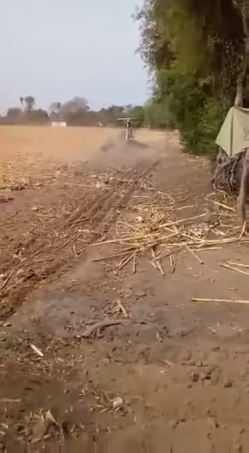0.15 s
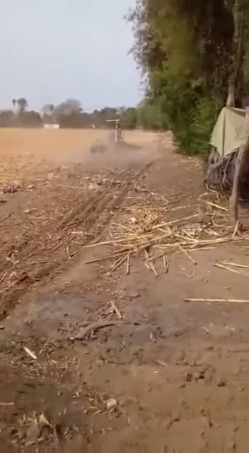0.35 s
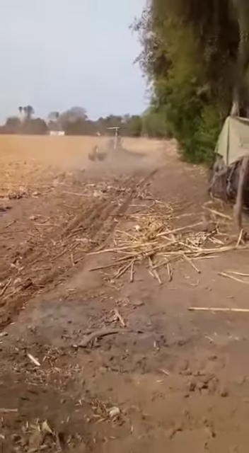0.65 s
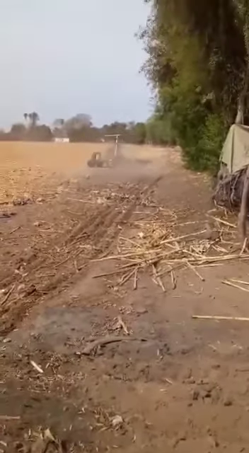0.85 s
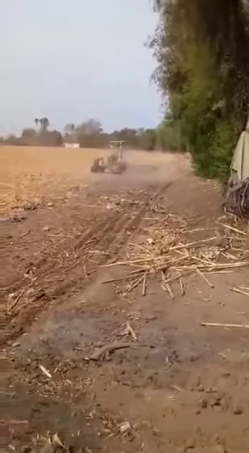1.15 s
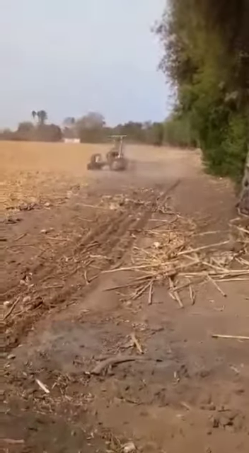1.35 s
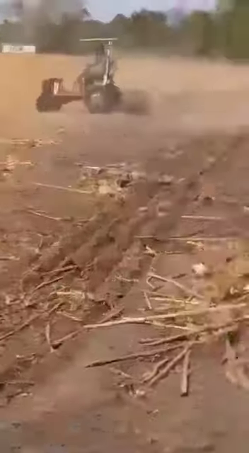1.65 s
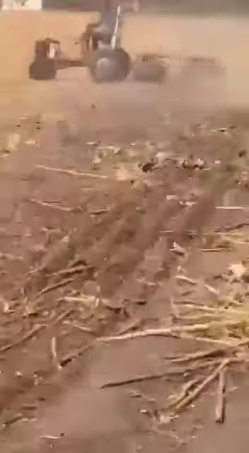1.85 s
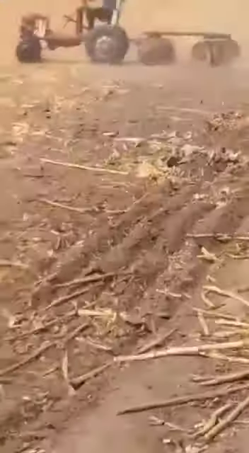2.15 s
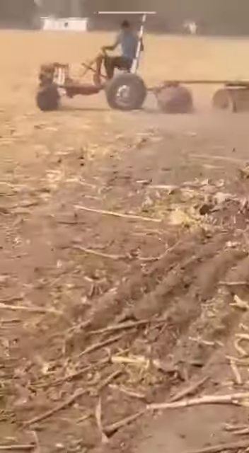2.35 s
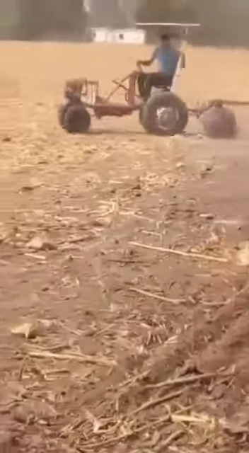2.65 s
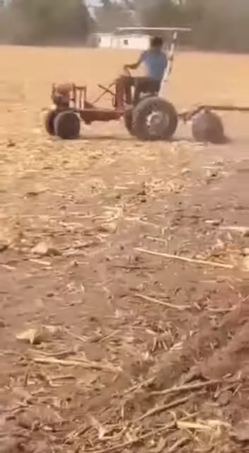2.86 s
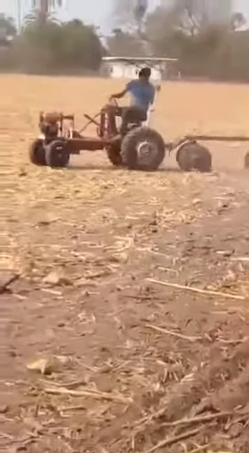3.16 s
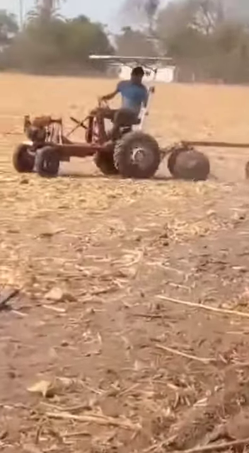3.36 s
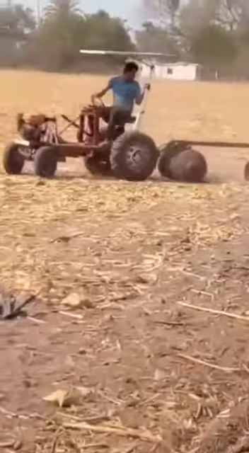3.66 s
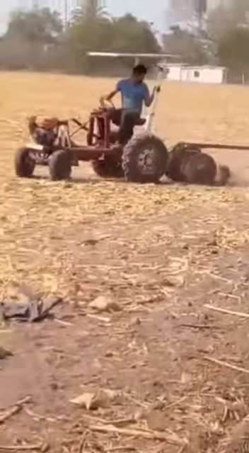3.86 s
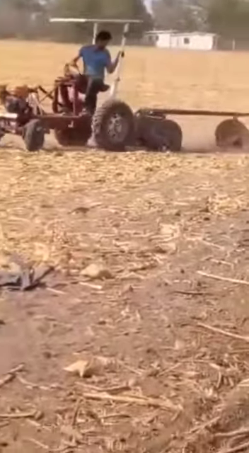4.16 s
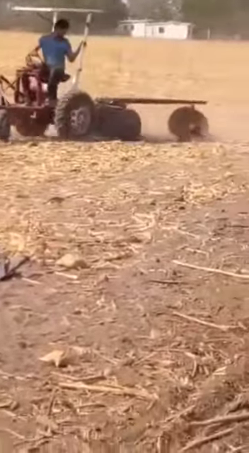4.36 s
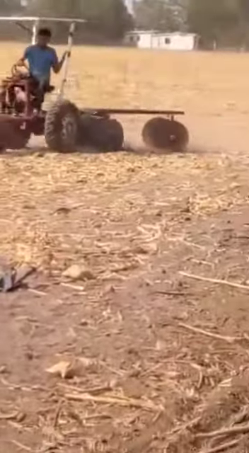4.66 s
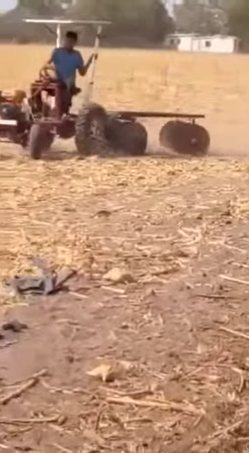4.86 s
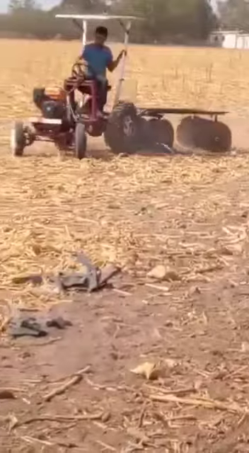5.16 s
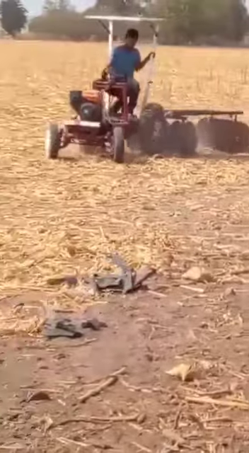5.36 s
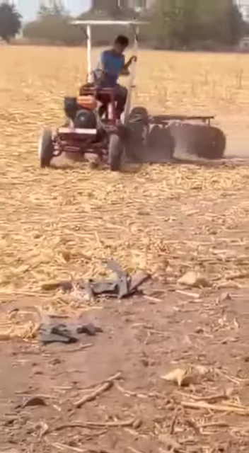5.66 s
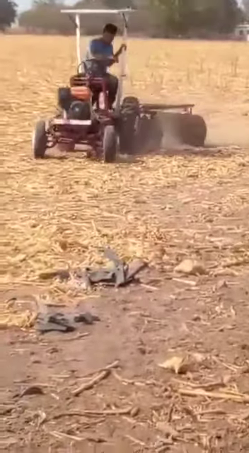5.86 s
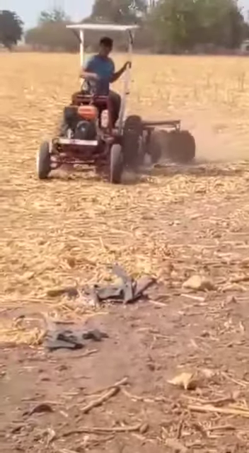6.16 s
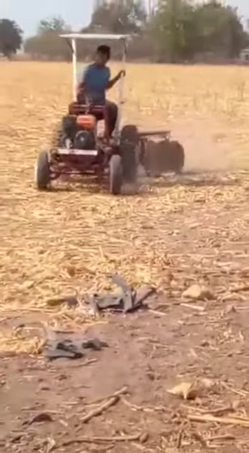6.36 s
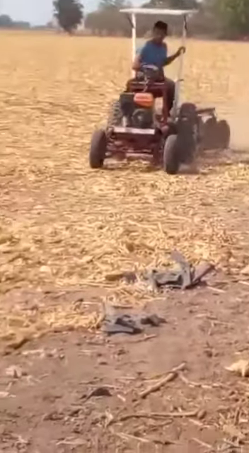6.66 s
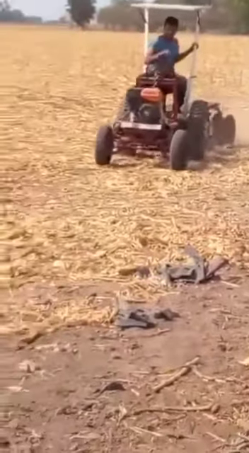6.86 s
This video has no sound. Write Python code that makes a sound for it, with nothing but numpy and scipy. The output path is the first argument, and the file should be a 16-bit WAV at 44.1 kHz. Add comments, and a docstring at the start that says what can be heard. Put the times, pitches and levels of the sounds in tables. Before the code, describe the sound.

A small one-cylinder petrol engine runs throughout in a dry open field, about 26 muffled thuds a second, nearly steady with a slight sag at the start. Valve clatter and papery disc hiss pulse with it. Wind rumbles and bumps the microphone in the first 2.5 seconds, with faint clanks at 0, 0.6, 1.3 and 2.1. Between 1.7 and 2.5 the rattle changes from distant to near, and the exhaust gradually grows. Thin chirps come at 0.5, 1.2, 1.75 and 2.8, more around 4.2 to 5.3. A sharper clank and stone tick fall at 3.8; two faint dove coos follow at 4.5 and 4.8. From 4.3 to 5 the tractor turns head-on, the engine fullest around 5.5 to 6.2. Gusts thump strongly at 5.2 to 6.8, with ticks and a clank near 6.6, the engine easing slightly but still running at 7.

```python
"""Tractor and disc harrow on dry stubble

A home-made tractor with a one-cylinder petrol engine drags a disc harrow and turns toward the microphone.
Pulses through a resonant muffler make the exhaust and intake thuds; noise beating with the engine's cycle
makes the clatter and the harrow's hiss, and decaying modes and noise its clanks and ticks on stones.
Birds chirp and a dove coos in gliding tones; gusts are low noise and short pressure swings."""
import sys
import numpy as np
from scipy import signal
from scipy.fft import rfft, irfft, next_fast_len
from scipy.io import wavfile
from scipy.ndimage import uniform_filter1d, map_coordinates

SR = 44100
rng = np.random.default_rng(int(sys.argv[2]) if len(sys.argv) > 2 else 0)


def transcribe(u):
    """Save the signal u as a 16-bit wav file named by the first command-line argument.

    u: samples, shape (n,) or (channels, n), limited to [-1, 1]; the rate is SR.
    q: integer samples, one column per channel.
    """
    v = np.clip(np.atleast_2d(u).T, -1, 1)
    q = np.round(v * 32767).astype(np.int16)
    wavfile.write(sys.argv[1], SR, q)


N = 309141  # length in samples

# Gusts. Each row: time of the peak in seconds, full width at 1/e in seconds, wind strength in dB.
GUSTS = [(.14, 0.21, -30.5), (0.414, 0.093, -30.5), (0.916, 0.94, -28.5), (1.33, 0.25, -26.5),
         (1.855, 0.14, -30), (2.137, 0.34, -27.5), (2.515, 0.064, -27), (3.947, 0.45, -33),
         (4.197, 0.11, -30), (5.236, 0.28, -25), (5.46, 0.2, -29.5), (5.822, 0.12, -24), (6.177, 0.27, -20),
         (6.38, 0.21, -25.5), (6.73, 0.27, -26.5)]
# The hardest eddies. Each row: time in seconds, relative push in dB, nominal push frequency in Hz,
# flick in dB.
BUFFETS = [(.104, -2.5, 91, -16), (0.424, -13, 121, -35), (.856, -6, 101, -22), (.926, -5, 113, -13),
           (.961, -13, 129, -19), (1.018, -10.5, 150, -15), (1.112, -5, 105, -44), (1.319, -3.5, 131, -9),
           (1.98, -8, 146, -27), (2.003, -9, 160, -28), (2.071, -19, 220, -14.5), (2.083, -9, 172, -12),
           (2.146, -12, 130, -13.5), (2.236, -8.5, 197, -7.5), (2.341, -14, 140, -23),
           (3.884, -15.5, 203, -18.5), (4.203, -16, 108, -30), (5.158, -14, 140, -11.5),
           (6.12, -5.5, 110, -12.5), (6.159, -7, 129, -9), (6.206, -5, 110, -10), (6.221, -4.5, 100, -12.5),
           (6.257, -5.5, 118, -13), (6.295, -9.5, 168, -9.5), (6.683, -10, 120, -10),
           (6.796, -10, 140, -12.5)]
# Spectrum of wind rumble on the microphone. Each row: frequency in Hz, relative density in dB per Hz.
RUMBLE_SPECTRUM = [(15, -40), (30, -25), (48, -8.5), (75, -1), (125, -2), (180, -11.5), (280, -11),
                   (420, -27), (700, -43), (1500, -52)]
# Spectrum of the brighter tearing of a strong gust. Each row: frequency in Hz, relative density in dB per Hz.
TEARING_SPECTRUM = [(160, -8.5), (290, 3), (450, -10.5), (620, -14.5), (850, -24)]
BREEZE_DB = -34.5  # mean wind strength between gusts
LULL_S, LULL_LENGTH_S, LULL_DB = 4.39, 0.18, -25  # the air falls still once
TEARING_DB, TEARING_EXPONENT = 6.5, 1.734  # level at full-scale wind; growth faster than the rumble's
SMALL_EDDIES_PER_S, SMALL_EDDY_HZ = 4.4, 125  # mean rate; nominal push frequency
SMALL_PUSH_DB, SMALL_FLICK_DB = 4, -4  # relative push over the wind; flick over that push

# Notes of a three-note bird call. Each row: delay in seconds, length in seconds, start, middle and end
# frequency in Hz, relative level in dB; each call rescales time and pitch.
PHRASE_NOTES = [(0, 0.05, 5230, 4790, 4070, -4.5), (.055, .04, 4220, 4440, 4700, -1),
                (.143, .028, 3400, 4100, 3800, 0.5)]
# Notes of a slurred call. Each row: the same columns in the same units.
SLUR_NOTES = [(0, 0.036, 4520, 4316, 3690, -0.5), (.046, 0.0302, 3380, 3377, 3140, -0.42)]
# A single falling note. Each row: the same columns in the same units.
DROP_NOTES = [(0, .042, 5300, 4750, 3550, 0)]
# A single arched note. Each row: the same columns in the same units.
ARCH_NOTES = [(0, .05, 4300, 5550, 3900, 0)]
# When the three-note call is sung. Each row: time in seconds, pitch ratio, length ratio, relative level in dB.
PHRASE_CALLS = [(.475, 1, 0.99, -33), (4.188, 1.01, 0.99, -34)]
# When the slur is sung. Each row: time in seconds, pitch ratio, length ratio, relative level in dB.
SLUR_CALLS = [(1.753, 1, 1, -31.5), (2.763, 1.03, .7, -37), (4.785, 1, 1, -34.5),
              (5.285, 1.16, 0.98, -33.5)]
# When the falling note is sung. Each row: time in seconds, pitch ratio, length ratio, relative level in dB.
DROP_CALLS = [(.277, .92, .9, -39), (2.223, 1, 1, -40), (5.91, 1, 0.99, -37)]
# When the arched note is sung. Each row: time in seconds, pitch ratio, length ratio, relative level in dB.
ARCH_CALLS = [(1.152, 0.95, .8, -40), (1.174, 0.91, .62, -36), (1.23, 0.95, 1.1, -42),
              (1.992, 1, 0.84, -46), (2.008, 0.86, 1, -44), (2.07, 1.02, 0.85, -39),
              (3.22, 0.98, 0.58, -37.5), (3.545, 1.09, 1.3, -40), (4.256, 1.03, 0.95, -40)]
# Coos of a distant dove. Each row: time in seconds, level in dB.
COOS = [(4.49, -38), (4.82, -44)]
COO_S, COO_HZ, COO_RISE_HZ = 0.127, 493, 55

# Stones ticking on the discs. Each row: time in seconds, relative level in dB, ring frequency in Hz.
TICKS = [(3.784, -23, 5700), (5.7264, -24.5, 5880), (6.5565, -22.5, 5920), (6.6288, -29.5, 5850),
         (6.89, -28, 5800)]
# Clanks of the harrow frame. Each row: time in seconds, relative level in dB.
CLANKS = [(0.029, -27), (0.589, -29), (1.272, -29), (1.496, -34), (2.1482, -25.5), (3.61, -27),
          (3.7864, -21), (6.616, -27)]
# Modes of the harrow frame. Each row: frequency in Hz, mean relative level in dB, 60 dB decay in seconds.
FRAME_MODES = [(1000, -2, 0.048), (1421, 7, 0.12), (1850, 5.5, 0.1), (2560, 13.5, 0.051), (2970, 5, 0.076)]
# Spectrum of a stone's crack. Each row: frequency in Hz, relative density in dB per Hz.
CRACK_SPECTRUM = [(1500, -24), (3500, -7), (4800, 10.5), (6200, 7), (7200, -9), (8100, 9), (11000, -46)]

# Rattle spectrum far off. Each row: frequency in Hz, relative density in dB per Hz.
FAR_RATTLE = [(480, -39), (850, 0), (1180, -34), (2000, -13), (2100, -0.5), (2270, 5.5), (3040, 0),
              (3440, 2.5), (3800, -4.5), (4210, -8.5), (4560, -15), (4880, -3), (6500, -12.5), (8450, -41),
              (14300, -120)]
# Rattle spectrum near, side-on. Each row: frequency in Hz, relative density in dB per Hz.
SIDE_ON_RATTLE = [(1180, -69), (2000, -15), (2120, -3.5), (2410, 4.5), (2730, 3), (2980, -3.5),
                  (3340, -4.5), (3670, -10.5), (4030, -5), (4510, -12), (4860, -7), (5360, -6),
                  (6500, -27.5), (8450, -50), (14300, -120)]
# Rattle spectrum near, head-on. Each row: frequency in Hz, relative density in dB per Hz.
HEAD_ON_RATTLE = [(1180, -40), (2000, -7), (2050, -10), (2420, 5), (2530, 2.5), (2780, 1.5), (3000, -9),
                  (4190, -10.5), (4490, -14), (4760, -13.5), (4960, -5.5), (6010, -16), (6500, -42),
                  (8450, -56), (14300, -120)]
# Spectrum of the engine block's panels. Each row: frequency in Hz, relative density in dB per Hz.
BLOCK_SPECTRUM = [(150, 7.5), (450, 7.5), (520, -11), (600, -2.5), (730, 0), (950, 0), (1080, 2),
                  (1280, -7.5), (1470, 3), (1610, -3), (1800, 3), (1930, -1), (2050, -14), (2400, -48)]
# Spectrum of discs in dry soil and straw, far off. Each row: frequency in Hz, relative density in dB per Hz.
FAR_STRAW = [(5500, -17), (7000, 1.5), (8300, -2.5), (9000, -2.5), (10300, -1), (13000, 0), (14600, 4),
             (15700, -4)]
# Spectrum of discs in dry soil and straw, near. Each row: frequency in Hz, relative density in dB per Hz.
NEAR_STRAW = [(5800, -3), (6600, -3.5), (7300, -2.5), (7650, 3), (8150, 0), (8500, 0.5), (9250, -2),
              (9850, 1), (11000, -0.5), (12000, 2.5), (12800, -1.5), (14200, 0), (15000, -3.5),
              (15700, -10)]
# Engine block as the tractor nears and turns. Each row: time in seconds, relative level in dB.
BLOCK_LEVEL = [(0.0, -40.5), (0.17, -43.5), (0.78, -41), (1.29, -43.5), (2.58, -43), (2.69, -41.5),
               (3.9, -40.5), (4.08, -43.5), (4.33, -43), (4.74, -38.5), (5.27, -36.5), (5.74, -36),
               (6.33, -41.5), (7.01, -40)]
# Valve clatter. Each row: time in seconds, relative level in dB.
VALVE_LEVEL = [(0.0, -39.5), (0.43, -37), (0.9, -40), (1.09, -39.5), (1.4, -43), (1.66, -42), (2.3, -40),
               (3.4, -38.5), (4.06, -36), (4.57, -36), (5.06, -35.5), (5.33, -34.5), (5.95, -36.5),
               (6.27, -40), (7.01, -41)]
# Hiss of the harrow. Each row: time in seconds, relative level in dB.
HISS_LEVEL = [(0.0, -46.5), (0.35, -43.5), (1.35, -47.5), (1.93, -46.5), (2.24, -46), (2.89, -43),
              (3.32, -45), (4.08, -40), (4.49, -43.5), (5.23, -40), (5.68, -43.5), (6.01, -43.5),
              (6.27, -47.5), (7.01, -46.5)]
# Discs cutting thicker straw. Each row: time in seconds, full width at 1/e in seconds, rise of the hiss in dB.
SWISHES = [(0.147, 0.093, 1.5), (1, 0.12, 5.5), (1.822, 0.12, 6), (3.125, .1, 2.5), (3.807, 0.088, 3)]
# Approach of the tractor. Each row: time in seconds, near share of the power.
NEARNESS = [(1.7, 0.23), (2.5, 0.99)]
# Turn toward the microphone. Each row: time in seconds, head-on share of the near power.
FACING = [(4.3, 0.06), (5, 1)]
# Knocks at the firing, then as the valves shut. Each row: place in the cycle as a fraction, relative size.
KNOCKS = [(0, 0.92), (.32, 0.17), (.7, 0.18)]
# A nearby reflection. Each row: time in seconds, delay in seconds, strength as an amplitude ratio.
REFLECTION = [(0, 0.0015, 0.071), (.7, 0.0017, 0), (1.4, 0.00094, 0.031), (2.6, 0.00097, 0.09),
              (7, 0.0021, 0.091)]

# Engine speed sagging under the load. Each row: time in seconds, mean firings per second.
ENGINE_SPEED = [(0, 27.03), (.35, 25.77), (.7, 26.04), (1.575, 25.83), (2.45, 26.22), (3.15, 26.2),
                (3.85, 26.68), (4.55, 26.57), (5.25, 26.3), (5.95, 26.55), (6.45, 26.83), (7, 26.45)]
# Exhaust loudness. Each row: time in seconds, relative level in dB.
EXHAUST_LEVEL = [(0, -37), (1.6, -32.5), (2.8, -31.5), (3.5, -32.5), (4.2, -29), (5.5, -27.5), (6.2, -27),
                 (7, -31)]
# Response of the muffler and air box. Each row: frequency in Hz, relative gain in dB.
MUFFLER_RESPONSE = [(25, -38), (55, 2.5), (105, -5), (132, 3.5), (160, 0), (185, -8.5), (238, 4), (268, -7),
                    (318, 2), (355, -7), (397, 1.34), (425, -9), (452, -12.5), (580, -30), (1100, -27),
                    (2200, -64)]
BOOM_DB = -37  # mean level: the pipe's low note carries evenly at any distance
TOP_HZ = 15750  # band limit


def amp(db):
    """Logarithmic level: decibels become an amplitude ratio."""
    return 10 ** (np.asarray(db) / 20)


def unit(x):
    """Normalisation: scale to an rms of 1."""
    return x / np.sqrt(np.mean(x ** 2) + 1e-20)


def gain(points, hz):
    """Frequency response: interpolate dB over log frequency, falling away past the ends."""
    f, db = np.transpose(points)
    corners = np.r_[f[0] / 2, f, f[-1] * 2]
    return amp(np.interp(np.log(hz + 1), np.log(corners), np.r_[-120, db, -120]))


def curves(rows):
    """Linear interpolation: one value per sample for each column after the time."""
    s, *columns = np.transpose(rows)
    return [np.interp(np.arange(N) / SR, s, column) for column in columns]


def wobble(rate):
    """Slow random modulation: a smooth curve through rate random knots a second."""
    knots = rng.standard_normal(int(N * rate / SR) + 4)
    return map_coordinates(knots, [np.arange(N) * rate / SR])


def swell(s, length):
    """Gaussian envelope: a bell-shaped rise and fall around time s."""
    return np.exp(-(2 * (np.arange(N) / SR - s) / length) ** 2)


def filtered(x, response):
    """Linear filtering: multiply the spectrum of x by a response of frequency."""
    m = next_fast_len(N + SR // 2)
    return irfft(rfft(x, m) * response(np.fft.rfftfreq(m, 1 / SR)), m)[:N]


def noise(points):
    """Coloured noise: white noise shaped by a spectrum, at rms 1."""
    return unit(filtered(rng.standard_normal(N), lambda hz: gain(points, hz)))


def impulse(points, size=16384):
    """Minimum phase: the causal ring of a body with this spectrum, at peak 1."""
    log_spectrum = np.log(gain(points, np.fft.rfftfreq(size, 1 / SR)) + 1e-3)
    cepstrum = irfft(log_spectrum)
    # folding the cepstrum onto positive times makes the ring causal
    cepstrum[1:size // 2] *= 2
    cepstrum[size // 2 + 1:] = 0
    ring = irfft(np.exp(rfft(cepstrum)))
    return ring / np.abs(ring).max()


def add(track, s, sound):
    """Superposition: mix a sound into the track at time s."""
    part = track[max(round(s * SR), 0):][:len(sound)]
    part += sound[:len(part)]


def scattered(x, t60):
    """Diffuse reflection: decaying noise answers for foliage and ground, as strong as the sound itself."""
    t = np.arange(SR // 3) / SR
    tail = rng.standard_normal(len(t)) * amp(-60 * t / t60)
    return unit(signal.fftconvolve(x, tail)[:N]) * np.std(x)


def eddy(t, hz, width):
    """Turbulent pressure: a windowed swing of about one cycle, with random phase and varied frequency."""
    hz = hz * np.exp(0.12 * rng.normal())
    phase = rng.uniform(0, 2 * np.pi)
    return np.exp(-(t / width) ** 2) * np.cos(2 * np.pi * hz * t + phase)


def buffets(strength):
    """Eddy impact: each eddy lands on the microphone as a quick flick and a slower push."""
    small = []
    for place, size in rng.random((round(SMALL_EDDIES_PER_S * N / SR), 2)):
        push_db = 20 * np.log10(strength[int(place * N)] * size) + SMALL_PUSH_DB
        small.append((place * N / SR, push_db, SMALL_EDDY_HZ, push_db + SMALL_FLICK_DB))
    thumps, t = np.zeros(N), np.arange(-SR // 30, SR // 30) / SR
    for s, push_db, push_hz, flick_db in BUFFETS + small:
        push = amp(push_db - 2.0) * eddy(t - .004, hz=push_hz, width=0.0057)
        haste = amp(np.clip(0.34 * (flick_db + 9.5), -2, 1))  # stronger eddies pass faster
        flick = amp(flick_db) * eddy(t * haste, hz=336, width=0.0013)
        add(thumps, s + t[0], push + flick)
    return thumps


def wind():
    """Flow noise: gusts on a light breeze rumble on the microphone port and tear more brightly when strong."""
    breeze = amp(BREEZE_DB + LULL_DB * swell(LULL_S, LULL_LENGTH_S) + 1.5 * wobble(9))
    gust_power = sum((amp(db) * swell(s, length)) ** 2 for s, length, db in GUSTS)
    strength = np.sqrt(breeze ** 2 + gust_power)
    rumble = amp(4.0) * strength * unit(noise(RUMBLE_SPECTRUM) * amp(2.07 * wobble(35)))
    flutter = unit(noise(TEARING_SPECTRUM) * amp(2.5 * wobble(60)))
    tearing = amp(TEARING_DB) * strength ** TEARING_EXPONENT * flutter
    return rumble + tearing + buffets(strength)


def dove():
    """Pure tone: soft coos under a half-sine envelope, slightly rising in pitch."""
    out, u = np.zeros(N), np.linspace(0, 1, int(COO_S * SR))
    phase = 2 * np.pi * np.cumsum(COO_HZ + COO_RISE_HZ * u) / SR
    for s, db in COOS:
        add(out, s, amp(db) * np.sin(np.pi * u) * np.sin(phase))
    return out


def birds():
    """Frequency modulation: four kinds of call glide with a burr and are blurred by the foliage."""
    song, burr = np.zeros(N), wobble(260)
    repertoire = [(PHRASE_NOTES, PHRASE_CALLS), (SLUR_NOTES, SLUR_CALLS),
                  (DROP_NOTES, DROP_CALLS), (ARCH_NOTES, ARCH_CALLS)]
    for notes, calls in repertoire:
        for s, pitch, stretch, call_db in calls:
            for delay, length, start_hz, middle_hz, end_hz, db in notes:
                u = np.linspace(0, 1, int(stretch * length * SR))
                glide = np.polyfit([0, .5, 1], [start_hz, middle_hz, end_hz], 2)
                hz = pitch * np.polyval(glide, u)
                flutter = np.roll(burr, rng.integers(N))[:len(u)]
                tone = np.sin(2 * np.pi * np.cumsum(hz * (1 + 0.028 * flutter)) / SR)
                envelope = np.sqrt(np.abs(np.sin(np.pi * u)))
                level = amp(call_db + db + 1.4 * flutter)
                add(song, s + stretch * delay, level * envelope * tone)
    return amp(1.0) * song + amp(-4.0) * scattered(song, t60=0.21)


def harrow():
    """Struck modes: stones tick brightly on the discs; the loose frame rings briefly over clods."""
    out, t = np.zeros(N), np.arange(SR // 4) / SR
    crackle = noise(CRACK_SPECTRUM)
    for s, db, ring_hz in TICKS:
        crack = amp(-60 * t / 0.038) * np.roll(crackle, rng.integers(N))[:len(t)]
        disc = 0.21 * amp(-60 * t / 0.14) * np.sin(2 * np.pi * ring_hz * t)
        onset = 1 - np.exp(-t / 0.001)
        add(out, s, amp(db - 1.5) * onset * (crack + disc))
    for s, db in CLANKS:
        ring = np.zeros(len(t))
        for hz, level, t60 in FRAME_MODES:
            ring += amp(level + rng.normal(0, 0.25) - 60 * t / t60) * np.sin(2 * np.pi * hz * t)
        clatter = amp(-60 * t / 0.12) * rng.standard_normal(len(t))
        add(out, s, amp(db - 15.5) * (ring + clatter))
    return out


def beating(cycle, depth, decay):
    """Amplitude modulation: metal parts knock at the firing and more lightly as the valves shut."""
    # decay is a fraction of the cycle
    knocks = sum(size * np.exp(-((cycle - turn) % 1) / decay) for turn, size in KNOCKS)
    return unit(1 + depth * knocks)


def blend(first, second, share):
    """Equal-power crossfade: the second sound takes this share of the power."""
    return np.sqrt(1 - share) * first + np.sqrt(share) * second


def block(cycle):
    """Panel radiation: the engine block's noise beats at each firing."""
    level_db = curves(BLOCK_LEVEL)[0] + 2.5
    return amp(level_db) * noise(BLOCK_SPECTRUM) * beating(cycle, depth=0.36, decay=0.066)


def valves(cycle, near):
    """Directivity: valve gear clatters throughout the cycle, changing colour as the tractor turns."""
    close = blend(noise(SIDE_ON_RATTLE), noise(HEAD_ON_RATTLE), curves(FACING)[0])
    rattle = blend(noise(FAR_RATTLE), close, near)
    level_db = curves(VALVE_LEVEL)[0] + 1.09 + 0.91 * wobble(40)
    return amp(level_db) * rattle * beating(cycle, depth=0.64, decay=0.3)


def hiss(cycle, near):
    """Friction noise: discs hiss in dry soil and straw, swish in thicker straw and beat with the engine."""
    swishes_db = sum(db * swell(s, length) for s, length, db in SWISHES)
    level_db = curves(HISS_LEVEL)[0] + swishes_db - 0.1 + 1.3 * wobble(11) + 0.92 * wobble(110)
    straw = blend(noise(FAR_STRAW), noise(NEAR_STRAW), near)
    return amp(level_db) * straw * beating(cycle, depth=0.64, decay=.2)


def bounce(x):
    """Comb filtering: a weak delayed copy stripes the treble, and the stripes slide as the path changes."""
    delay, strength = curves(REFLECTION)
    return x + strength * map_coordinates(x, [np.arange(N) - delay * SR])


def patchy(x, depth_db):
    """Interference: stray reflections colour the sound in patches that come and go as things move."""
    spectrogram = signal.stft(x, nperseg=1024)[2]
    field = rng.standard_normal(spectrogram.shape)
    for _ in range(2):
        field = uniform_filter1d(field, size=5, axis=0)  # across frequency
        field = uniform_filter1d(field, size=36, axis=1)  # across time
    return signal.istft(spectrogram * amp(depth_db * unit(field)), nperseg=1024)[1][:N]


def machine(cycle):
    """Common modulation: block, valve gear and discs beat in time with the engine's cycle."""
    near = curves(NEARNESS)[0]
    rattle = block(cycle) + valves(cycle, near) + hiss(cycle, near)
    return patchy(bounce(rattle), depth_db=1.5)


def strokes(cycle, scatter_db):
    """Pulse train: one pulse of slightly varying size each time the cycle comes round."""
    at = np.flatnonzero(np.diff(np.floor(cycle)) > 0)
    return np.bincount(at, amp(scatter_db * rng.standard_normal(len(at))), N)


def boom(cycle, order):
    """Resonance: the pipe sounds on one multiple of the firing rate."""
    return amp(3 * wobble(5)) * np.cos(2 * np.pi * order * cycle)


def exhaust(cycle):
    """Source and filter: gas puffs out and, at another point of the turn, air is sucked in; both ring the muffler."""
    intake = cycle - .705
    puffs = strokes(cycle, scatter_db=2.25) - .5 * strokes(intake, scatter_db=1.6)
    thuds = unit(signal.fftconvolve(puffs, impulse(MUFFLER_RESPONSE))[:N])
    drift = np.pi * np.arange(N) / SR / 2  # the echo paths change as the tractor moves
    echo = np.cos(drift) * scattered(thuds, t60=0.42) + np.sin(drift) * scattered(thuds, t60=0.29)
    level = amp(curves(EXHAUST_LEVEL)[0])
    return level * (amp(-1.53) * thuds + amp(-9.5) * echo) + amp(BOOM_DB) * boom(cycle, order=5)


def scene():
    """Superposition: one engine cycle drives exhaust and rattle alike, among the other sources."""
    cycle = np.cumsum(curves(ENGINE_SPEED)[0] * (1 + 0.002 * wobble(12))) / SR
    background = wind() + dove() + birds()
    return (background + harrow() + machine(cycle) + exhaust(cycle))[None]


def record(dry):
    """Band limiting: nothing passes at or above the top frequency."""
    return filtered(dry[0], lambda hz: hz < TOP_HZ)[None]


dry = scene()
out = record(dry)
transcribe(out)
```